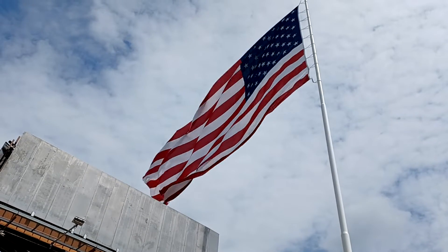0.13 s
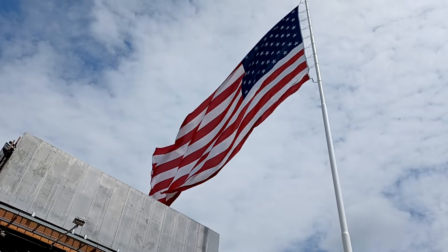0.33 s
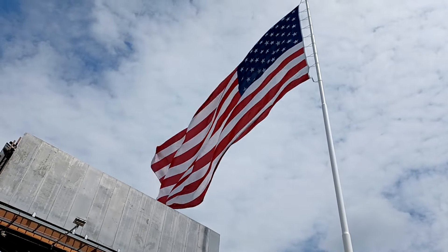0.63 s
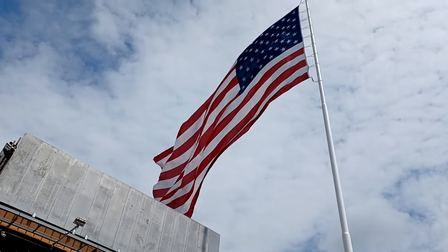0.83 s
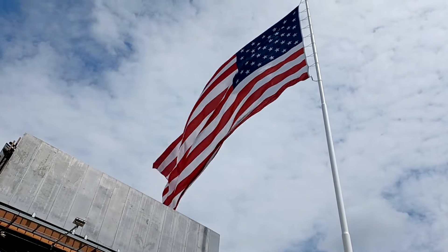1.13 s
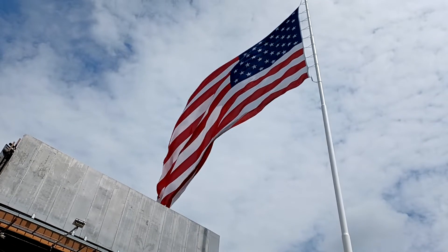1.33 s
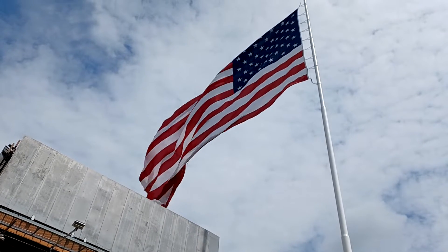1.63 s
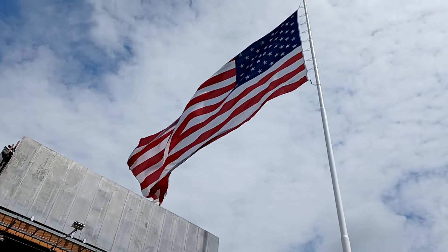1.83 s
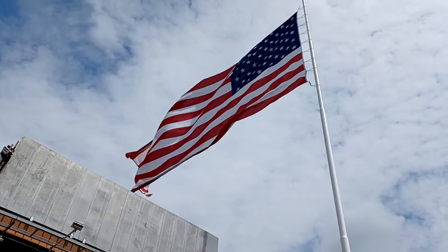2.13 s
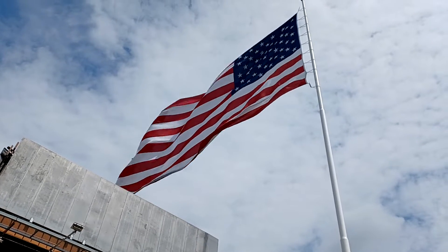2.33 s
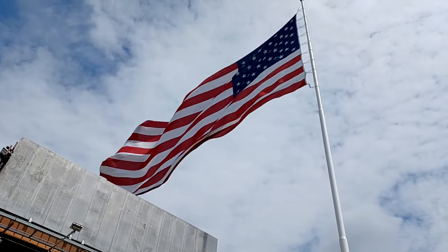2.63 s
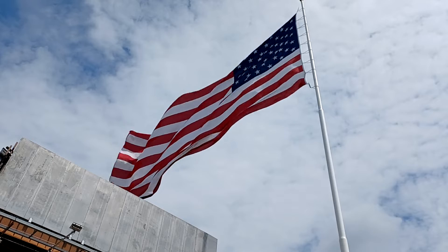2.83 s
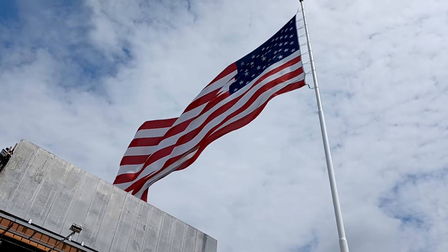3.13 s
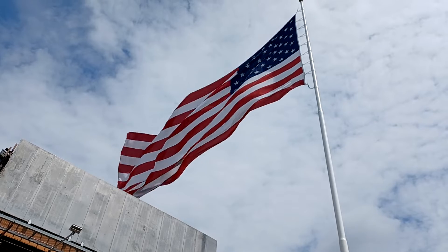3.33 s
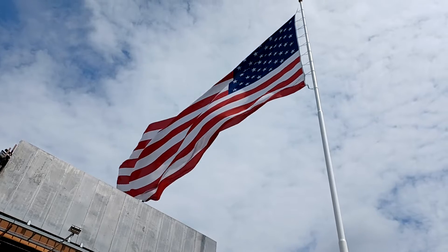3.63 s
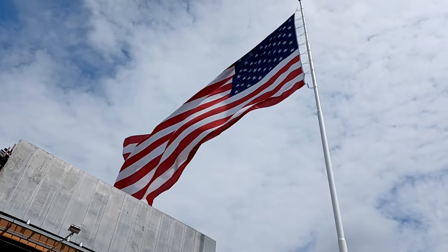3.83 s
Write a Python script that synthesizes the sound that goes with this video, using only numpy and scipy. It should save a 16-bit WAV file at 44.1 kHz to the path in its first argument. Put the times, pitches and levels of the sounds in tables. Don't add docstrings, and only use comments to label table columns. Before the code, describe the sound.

A large cloth flag snaps and rustles on a tall pole outdoors while gusty wind thumps unprotected stereo microphones; rope clips tick against the pole, faint pulley squeaks come later, and far traffic hums.

```python
import sys
import numpy as np
from scipy import signal
from scipy.fft import rfft, irfft
from scipy.io import wavfile
from scipy.ndimage import uniform_filter1d

SR = 44100
rng = np.random.default_rng(int(sys.argv[2]) if len(sys.argv) > 2 else 0)


def rack_gain(trim_db):
    fader = np.asarray(trim_db, float)
    return 10 ** (fader / 20)


def to_wav(s):
    ch = np.atleast_2d(s).T
    pcm = np.round(np.clip(ch, -1, 1) * 32767)
    wavfile.write(sys.argv[1], SR, pcm.astype(np.int16))


N = 176400

CLOTH_ALIKE = 0.27
RIGHT_LAG = 7


def in_time(rows):
    times, *columns = np.transpose(rows)
    seconds = np.arange(N) / SR
    return [np.interp(seconds, times, column) for column in columns]


def rms_one(x):
    return x / np.sqrt(np.mean(x ** 2) + 1e-20)


def colour(x, points):
    hz, db = np.transpose(points)
    bins_hz = np.arange(N // 2 + 1) * SR / N + 1
    gain_db = np.interp(np.log(bins_hz), np.log(hz), db, right=-90)
    return rms_one(irfft(rfft(x) * rack_gain(gain_db), N))


def drift(rate_hz):
    pole = np.exp(-80 * np.pi * rate_hz / SR)
    noise = rng.standard_normal(N // 40 + 2002)
    slow = signal.lfilter([1], [1, -2 * pole, pole * pole], noise)[2000:]
    return np.interp(np.arange(N) / 40, np.arange(len(slow)), rms_one(slow - slow.mean()))


def lump():
    swell = drift(19)
    longest_s = 0.15
    return np.tanh(swell - uniform_filter1d(swell, size=int(longest_s * SR)))


def ring(x, hz, t60_s):
    radius, angle = rack_gain(-60 / (t60_s * SR)), 2 * np.pi * hz / SR
    y = signal.lfilter([1, 0, -1], [1, -2 * radius * np.cos(angle), radius * radius], x)
    return y / np.abs(y).max()


def add(out, start_s, piece):
    i = max(int(start_s * SR), 0)
    out[..., i:i + piece.shape[-1]] += piece[..., :N - i]


def pair(alike):
    mid, side = rng.standard_normal((2, N))
    alike = np.clip(alike, 0, 1)
    return np.sqrt(1 + alike) * mid + np.sqrt(1 - alike) * side * [[1], [-1]]


def traffic():
    # (frequency [Hz], level [dB])
    hum_colour = [(300, -9), (1600, -4.5), (2400, -11.5), (3200, -23.5), (3700, -40), (5000, -22.5),
                  (9200, -30.5), (16000, -42)]
    # (frequency [Hz], level [dB])
    tyre_colour = [(1500, -24.5), (2800, -3.5), (3800, -4.5), (5000, -11.5), (8000, -21)]
    hum_db, car_db, car_loss_db, car_fade_s, alike = -57.5, -63, 22.5, 0.92, 0.076
    away = 1 / (1 + np.exp((car_fade_s - np.arange(N) / SR) / 0.22))
    car_swell_db, hum_swell_db = 1.2 * drift(5), 1.2 * drift(2.4)
    car = rack_gain(car_db - car_loss_db * away + car_swell_db) * colour(pair(alike), tyre_colour)
    hum = rack_gain(hum_db + hum_swell_db) * colour(pair(alike), hum_colour)
    return car + hum


def squeaks():
    # (time [s], length [s], level [dB], start pitch [Hz], end pitch [Hz])
    squeak_list = [(1.885, 0.041, -82, 6300, 6300), (2.14, 0.026, -77, 6300, 6400),
                   (2.675, 0.037, -78, 6350, 6300), (2.70, .05, -81, 11700, 11600),
                   (2.685, .02, -70, 12400, 11800), (2.965, 0.021, -78, 6500, 6560),
                   (3.125, 0.066, -78.5, 6600, 6500), (3.21, 0.045, -68, 6100, 6530),
                   (3.258, 0.037, -70.5, 6500, 6130), (3.27, .03, -73, 12450, 11900),
                   (3.40, 0.022, -80, 11800, 12300)]
    out, octave_db = np.zeros(N), -14
    jitter = 0.011 * drift(150)
    rough = rack_gain(3.5 * drift(90))
    for start_s, length_s, level_db, start_hz, end_hz in squeak_list:
        u, i = np.linspace(0, 1, int(length_s * SR)), int(start_s * SR)
        now = slice(i, i + len(u))
        glide_hz = (start_hz + (end_hz - start_hz) * u) * (1 + jitter[now])
        phase = 2 * np.pi * np.cumsum(glide_hz) / SR
        octave = rack_gain(octave_db) * (start_hz < 8000) * np.sin(2 * phase)
        swell = np.sin(np.pi * u) ** .5
        add(out, start_s, rack_gain(level_db + 4) * swell * rough[now] * (np.sin(phase) + octave))
    return out


def clip_ticks():
    # (time [s], peak [dB], pitch [Hz], bright edge against body [dB])
    tick_list = [(0.142, -59.5, 6000, 11), (0.409, -50, 4200, -24), (0.7055, -39, 4400, -16),
                 (0.7081, -35, 5100, -9.5), (0.893, -40.5, 5500, -1), (0.904, -51.5, 5970, 4),
                 (0.972, -52.5, 6030, 6.5), (1.135, -52.5, 6000, -13), (1.311, -36.5, 5140, 9.5),
                 (1.362, -48.5, 6000, 10.5), (1.4004, -52.5, 7200, 2), (1.436, -56, 6920, 8),
                 (1.46, -61, 7070, -10), (1.6534, -44.5, 7100, -3), (1.718, -52.5, 7100, -2.5),
                 (1.721, -45.5, 7040, -15), (1.95, -50, 5240, -13), (2.068, -51.5, 7250, -9),
                 (2.086, -48, 7250, -6), (2.169, -43, 5300, -31), (2.36, -47.5, 7200, -26),
                 (2.4796, -52, 7600, -17), (2.613, -45.5, 8300, -12.5), (2.634, -63.5, 7160, 18.5),
                 (2.7772, -34.5, 4500, -26), (2.7772, -26, 5800, -24), (2.797, -60.5, 5500, 6.5),
                 (2.9942, -41.5, 5650, -18), (3.039, -49, 6300, -10.5), (3.475, -38, 4670, -31),
                 (3.4945, -36.5, 5560, -7), (3.592, -55, 8600, -9), (3.6052, -45, 8140, 5),
                 (3.986, -42, 5460, -18)]
    knock_s, body_t60_s, edge_hz, edge_t60_s = 0.00045, 0.0025, 9400, 0.0004
    tail_db, tail_t60_s = -25.5, 0.095
    out, t = np.zeros((2, N)), np.arange(int(.2 * SR)) / SR
    knock = (t / knock_s) ** 2 * np.exp(2 - t / knock_s * 2)
    tail = rack_gain(tail_db - 60 * t / tail_t60_s)
    for start_s, peak_db, pitch_hz, edge_db in tick_list:
        shared = knock * rng.standard_normal(len(t))
        echo, own = rng.standard_normal((2, 2, len(t)))
        burst = np.array([shared, np.roll(shared, RIGHT_LAG)]) + tail * echo
        body = ring(burst + .4 * knock * own, pitch_hz, body_t60_s)
        edge = ring(burst + .8 * knock * own, edge_hz, edge_t60_s)
        add(out, start_s, rack_gain(peak_db) * (body + rack_gain(edge_db) * edge))
    return out


def swishes():
    # (time [s], length [s], level [dB])
    swish_list = [
        (0.704, .05, -77.5),
        (0.883, .045, -70.5),
        (0.953, 0.083, -71.5),
        (1.117, .06, -78.5),
        (1.313, 0.07, -63.5),
        (1.345, 0.12, -67),
        (2.063, 0.04, -69),
        (2.6, 0.065, -75),
        (3.572, .09, -76.5),
    ]
    envelope, noise = np.zeros(N), pair(CLOTH_ALIKE)
    for start_s, length_s, level_db in swish_list:
        u = np.linspace(0, 1, int(length_s * SR))
        add(envelope, start_s, rack_gain(level_db) * np.minimum(u * 8, 1) * (1 - u))
    crackle = rms_one(uniform_filter1d(noise.sum(axis=0), size=SR // 400))
    grain = rack_gain(4 * crackle)
    bright = signal.butter(2, [9000, 16500], "band", fs=SR, output="sos")
    return envelope * grain * rms_one(signal.sosfilt(bright, noise))


def rustle():
    # (time [s], level [dB])
    flutter = [(0, -61), (.15, -73), (.27, -79), (.45, -83), (.6, -69), (.95, -71), (1.2, -73.5),
               (1.3, -72), (1.55, -72), (2.0, -87), (2.5, -82.5), (2.65, -71), (2.95, -83), (3.2, -76.5),
               (3.4, -72), (3.6, -69), (4, -70.5)]
    # (frequency [Hz], level [dB])
    rustle_colour = [(2500, 0.5), (3800, -3), (4800, 0), (6400, -4), (8500, -10), (12500, -11.5),
                     (16200, -10)]
    flutter_db, = in_time(flutter)
    return colour(pair(CLOTH_ALIKE), rustle_colour) * rack_gain(6.5 + flutter_db + 1.5 * drift(14))


def snaps():
    # (time [s], peak [dB], pitch [Hz])
    snap_list = [(0.1789, -28, 1290), (0.2439, -20, 1190), (0.292, -34.5, 1400), (0.469, -47, 800),
                 (0.7149, -28, 1010), (1.027, -28, 790), (1.307, -30, 1660), (1.311, -35, 1980),
                 (1.667, -36, 700), (1.7856, -32, 1200), (2.7744, -40, 1150), (2.777, -28.5, 2400),
                 (2.8145, -29.5, 850), (3.2459, -14.5, 435), (3.444, -33, 1200), (3.4945, -19, 1220)]
    snap_cycles, kick_s = 2.5, 0.00085
    out, t = np.zeros((2, N)), np.arange(int(.02 * SR)) / SR
    dull = signal.butter(4, 2600, fs=SR, output="sos")
    for start_s, peak_db, pitch_hz in snap_list:
        noise = rng.standard_normal(len(t))
        kick = (0.53 * noise - 1) * t * np.exp(-t / kick_s)
        snap = ring(signal.sosfilt(dull, kick), pitch_hz, snap_cycles / pitch_hz)
        add(out, start_s, rack_gain(peak_db) * np.array([snap, np.roll(snap, RIGHT_LAG)]))
    return out


def wind():
    # (time [s], level [dB])
    gusts = [(0, -25), (.3, -27), (.5, -33), (.68, -26.5), (.9, -24.5), (1.05, -31), (1.4, -31), (1.6, -33),
             (1.92, -29.5), (2.02, -37.5), (2.3, -42.5), (2.55, -37), (2.88, -42.5), (3.21, -35.5),
             (3.25, -33), (4, -30)]
    # (frequency [Hz], level [dB])
    wind_colour = [(25, -26), (100, 0.5), (180, -3), (250, -0.5), (420, -3.5), (700, -18.5), (1500, -31.5),
                   (4000, -59.5)]
    split_hz = [173, 640]
    eddies_per_s, eddy_spread_db, lump_db = 1200, 2.5, 4
    gust_db, = in_time(gusts)
    shared, out = lump(), []
    cuts = [(split_hz[0], "low"), (split_hz, "band"), (split_hz[1], "high")]
    for port in range(2):
        own, total = lump(), 0
        for cut_hz, kind in cuts:
            strength = rack_gain(eddy_spread_db * np.minimum(rng.exponential(1, N), 5))
            push_or_pull = rng.choice([-1, 1], N)
            eddies = strength * push_or_pull * (rng.random(N) < eddies_per_s / SR)
            lumps = rack_gain(lump_db * (0.59 * shared + 0.83 * own + 0.61 * lump()))
            size_band = signal.butter(2, cut_hz, kind, fs=SR, output="sos")
            total = total + signal.sosfilt(size_band, eddies * lumps)
        out.append(colour(total, wind_colour) * rack_gain(3 + gust_db))
    return np.array(out)


def buffets():
    # (time of the crest [s], peak [dB], pitch [Hz])
    left_eddies = [(0.005, -19, 345), (0.082, -16.5, 415.2), (0.112, -13.5, 261), (0.197, -20.5, 355),
                   (0.246, -5.5, 479), (0.284, -19.0, 355), (0.346, -13.5, 306), (0.396, -13, 355),
                   (0.477, -30, 355), (0.504, -12, 390), (0.66, -17, 422), (0.717, -7.5, 355),
                   (0.748, -21, 351), (0.843, -23, 479), (0.878, -9.5, 360), (0.953, -25, 306),
                   (1.067, -12, 227), (1.135, -15.5, 125), (1.145, -20.1, 265), (1.215, -18.5, 352),
                   (1.253, -24, 306), (1.475, -11, 327), (1.502, -28, 306), (1.673, -12, 272),
                   (1.704, -16, 306), (1.77, -30.5, 263), (1.8, -16.5, 352), (1.846, -17.5, 407),
                   (1.901, -16.5, 403), (1.933, -30, 350), (2.066, -18, 122), (2.181, -21.5, 272),
                   (2.216, -23.5, 340), (2.395, -36, 302), (2.436, -25.0, 195.8), (2.626, -22, 357),
                   (2.628, -26, 122), (3.015, -23, 257), (3.249, -9, 263), (3.289, -18, 263),
                   (3.317, -17.5, 300), (3.399, -22, 395), (3.446, -14, 264), (3.526, -22, 310),
                   (3.621, -21, 107), (3.683, -23.5, 258), (3.771, -16, 347), (3.857, -31, 262),
                   (3.906, -14, 300), (3.99, -14, 230)]
    # (time of the crest [s], peak [dB], pitch [Hz])
    right_eddies = [(0.02, -15, 347), (0.081, -14.9, 407), (0.114, -12.5, 270), (0.192, -16.0, 428),
                    (0.247, -9.5, 355), (0.346, -10, 303), (0.394, -10.5, 270), (0.5, -38, 302),
                    (0.66, -25, 306), (0.719, -12, 360), (0.745, -13.5, 350), (0.785, -17, 355),
                    (0.84, -17, 350), (0.869, -8, 420), (0.947, -14, 200), (1.065, -11.5, 227),
                    (1.081, -23, 479), (1.146, -19, 403), (1.193, -25, 405), (1.275, -21, 308),
                    (1.302, -21, 413), (1.46, -11.5, 259), (1.498, -15, 355), (1.668, -14, 460),
                    (1.707, -10.5, 368), (1.867, -18, 148), (1.896, -12, 382), (1.937, -29, 300),
                    (1.963, -20.5, 353), (2.067, -21.5, 295), (2.182, -22.5, 249.4), (2.223, -19.5, 250),
                    (2.396, -37, 364), (2.44, -26, 169), (2.51, -36, 300), (2.559, -26, 347),
                    (2.599, -34, 262), (2.626, -18, 263), (2.672, -25.5, 300), (3.251, -13, 260),
                    (3.294, -21.0, 412), (3.328, -19, 330), (3.571, -25.5, 263), (3.605, -25.5, 412),
                    (3.634, -19, 355), (3.681, -20.4, 297), (3.744, -19, 308), (3.856, -19.5, 263),
                    (3.905, -18.5, 300), (3.979, -13, 260)]
    # (time of the crest [s], peak [dB])
    thump_list = [(0.279, -22), (.52, -25.5), (0.719, -20), (1.469, -22), (1.591, -24), (1.94, -18.5),
                  (2.049, -25.5), (2.141, -26), (2.72, -27), (3.31, -19.5), (3.335, -18.5), (3.55, -24.5)]
    cluster_s, ring_cycles, thump_hz, thump_t60_s, thump_db = 0.012, 3.5, 107, 0.053, -16.5
    out, t = np.zeros((2, N)), np.arange(int(.08 * SR)) / SR
    soft = signal.butter(3, 520, fs=SR, output="sos")
    cluster = t ** 2 * np.exp(-t / (cluster_s / 4))
    thumps = [(crest_s, peak_db, thump_hz) for crest_s, peak_db in thump_list]
    for port, eddies in zip(out, (list(left_eddies) + thumps, list(right_eddies) + thumps)):
        for crest_s, peak_db, pitch_hz in eddies:
            kicks = signal.sosfilt(soft, rng.standard_normal(len(t)) * cluster)
            thump = rack_gain(thump_db) * ring(kicks, thump_hz, thump_t60_s)
            piece = ring(kicks, pitch_hz, ring_cycles / pitch_hz) + thump
            power = uniform_filter1d(piece ** 2, size=int(SR / pitch_hz))
            rise_s = np.argmax(power) / SR
            add(port, crest_s - rise_s, piece * rack_gain(peak_db + 1))
    return out


def scene():
    far = traffic() + squeaks() + clip_ticks() + swishes() + rustle() + snaps()
    right_louder_db = 1
    return far * rack_gain(right_louder_db * np.array([[-.5], [.5]])) + wind() + buffets()


def roll_off(x):
    return signal.sosfilt(signal.butter(12, 15870, fs=SR, output="sos"), x)


def record(dry):
    return roll_off(dry)


dry = scene()
out = record(dry)
to_wav(out)
```